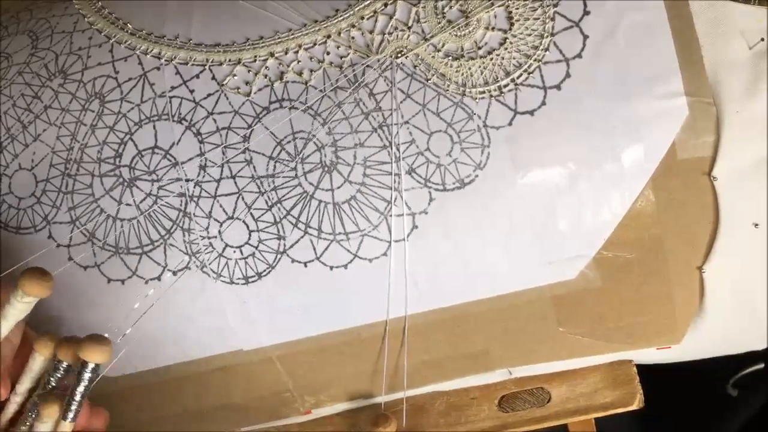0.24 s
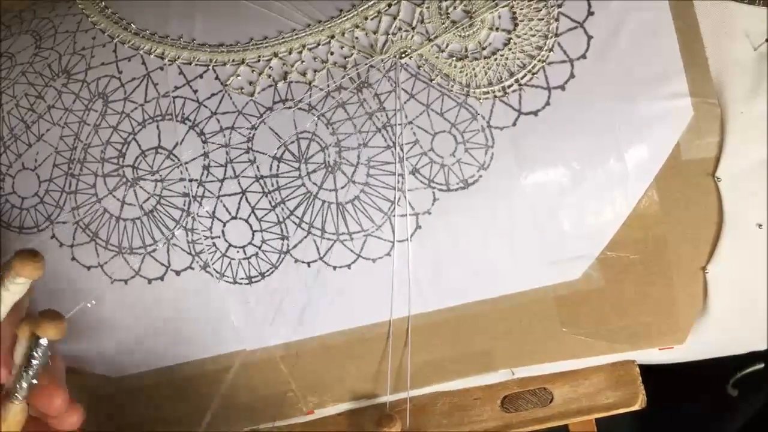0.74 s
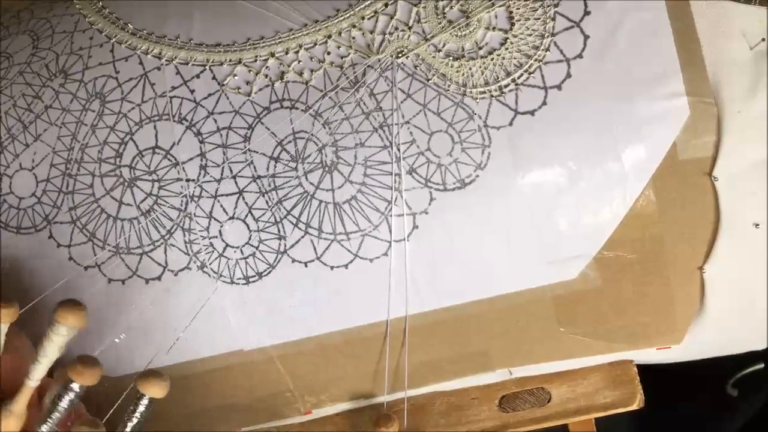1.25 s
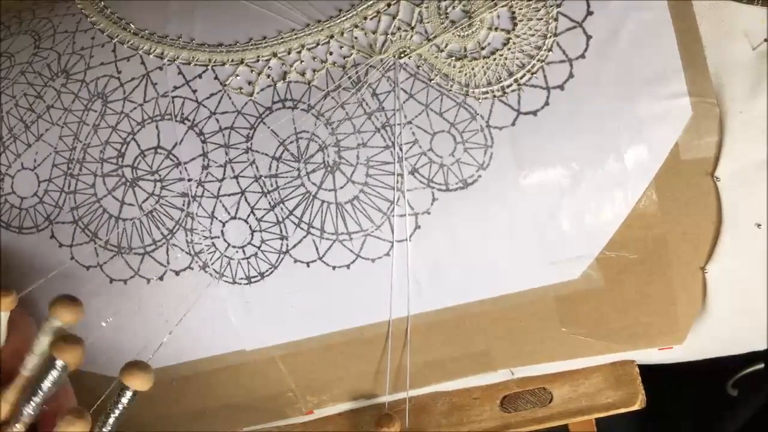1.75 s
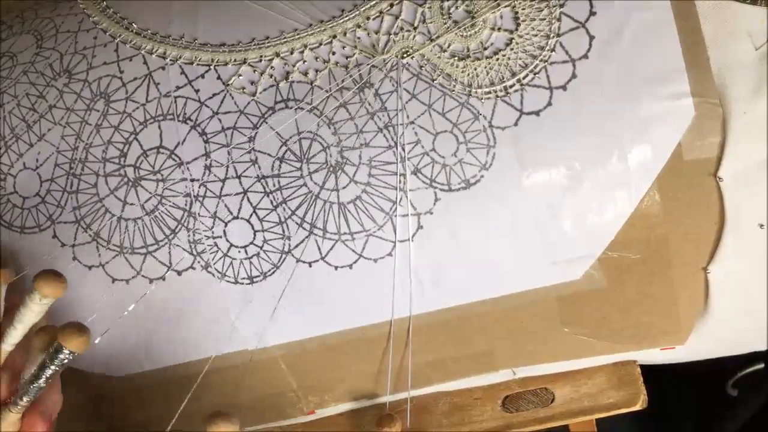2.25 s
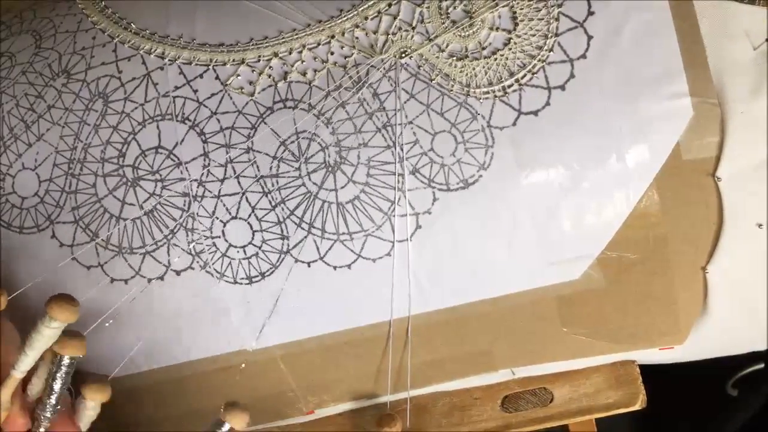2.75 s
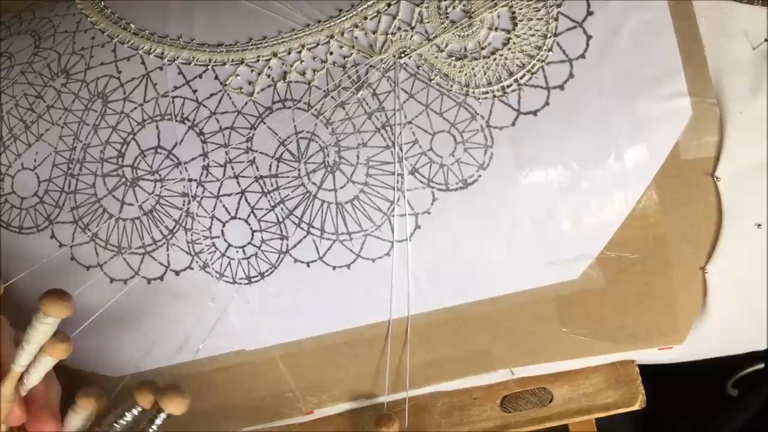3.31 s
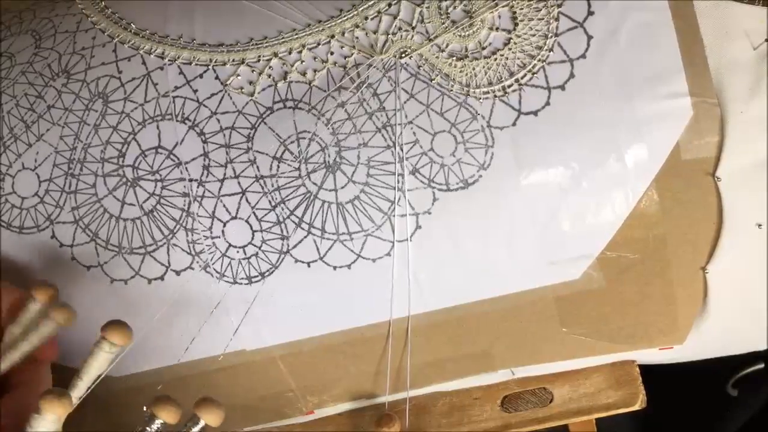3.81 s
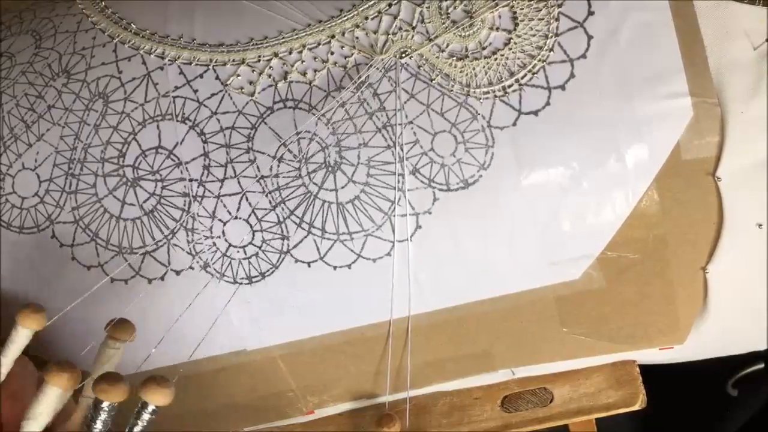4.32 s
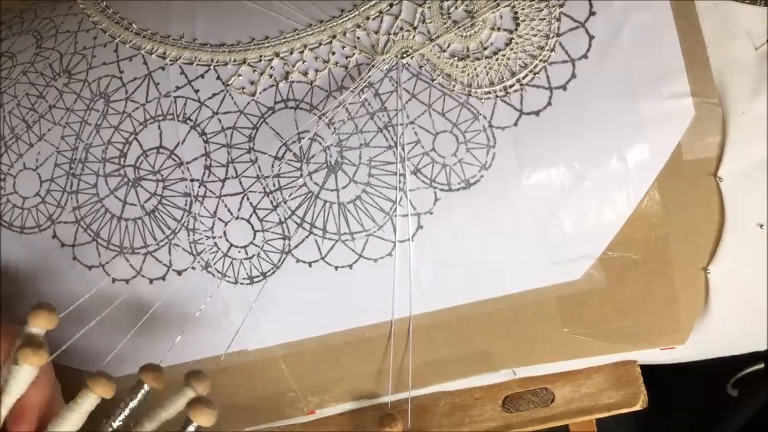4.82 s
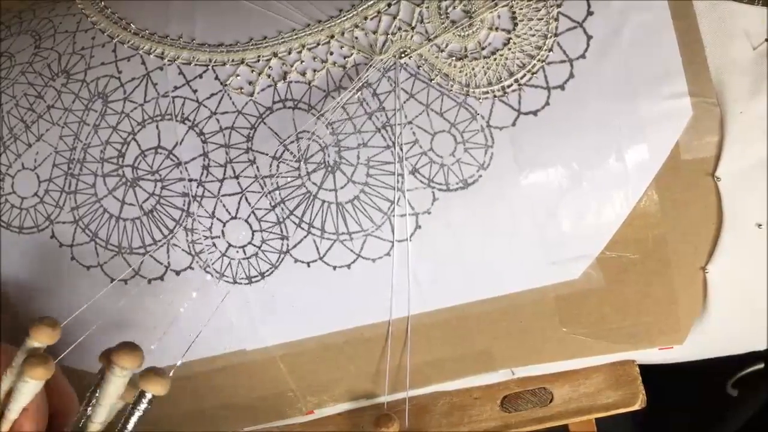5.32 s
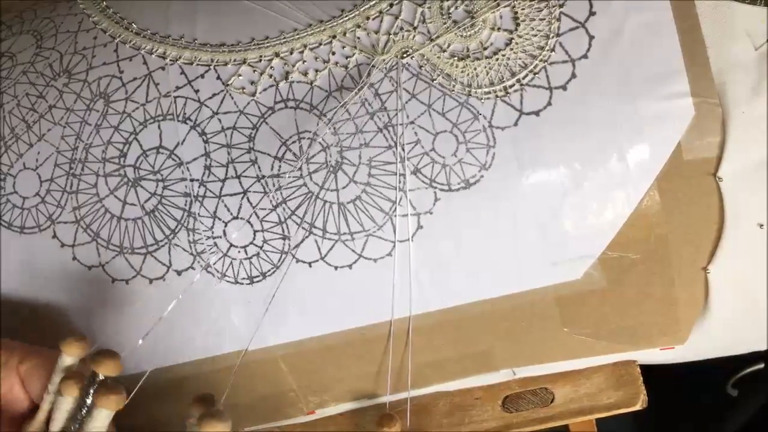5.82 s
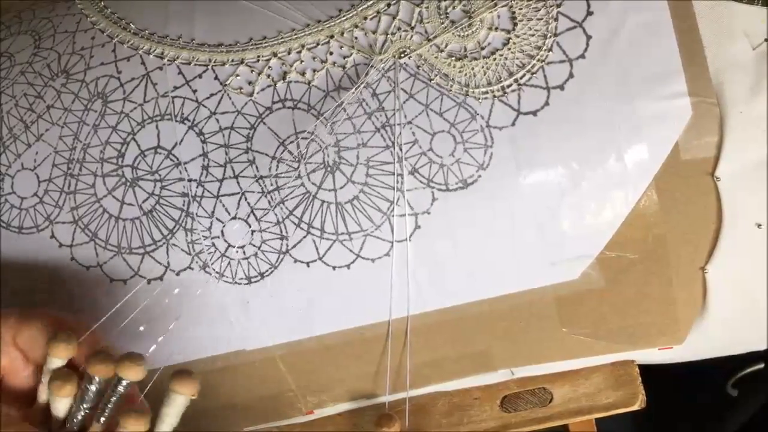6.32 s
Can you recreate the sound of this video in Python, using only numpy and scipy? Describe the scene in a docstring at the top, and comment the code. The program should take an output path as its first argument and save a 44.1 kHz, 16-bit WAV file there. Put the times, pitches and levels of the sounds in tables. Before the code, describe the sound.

Hard little sticks of wood click together irregularly as lace is worked by hand, heard from very near. Pairs and small flurries alternate with brief pauses, busier from about two and a half seconds on. Each click is crisp, high and quickly damped, some with a soft lower ring. Occasional duller knocks, a tiny chatter and faint rubbing join in. The small room adds a short tail over barely audible hum and air.

```python
"""A faint motor hum (slightly wavering sines) and soft air (shaped noise) fill a small quiet room throughout.
From the start wooden lace bobbins are crossed and twisted close by: each click rings the bending modes
of two slender sticks over a sharp noise tick and a dull clack, and some dull knocks ring the stand.
Under some clicks a lowest mode rings low and soft; later the shafts rub softly in the hand, as noise
sent through their modes, and near 5.3 s one chatters along the stand. A short diffuse tail is the room."""
import sys
import numpy as np
from scipy import signal
from scipy.fft import rfft, irfft
from scipy.io import wavfile

SR = 44100
rng = np.random.default_rng(int(sys.argv[2]) if len(sys.argv) > 2 else 0)


def master_out(mix):
    """Clip the mix to full scale and print it as 16-bit PCM to the path in sys.argv[1]."""
    frames = np.transpose(np.atleast_2d(mix))
    ceiling = np.clip(frames, -1, 1)
    pcm = np.round(ceiling * 32767).astype(np.int16)
    wavfile.write(sys.argv[1], SR, pcm)


N = 289296

# The four bending modes of each bobbin in play.
# Each entry: the bobbin's letter, then its mode frequencies in Hz from the lowest to the highest.
BOBBIN_MODES = {"A": (1057, 2861, 5348, 8290), "B": (1076, 2920, 5500, 8060), "C": (1122, 3190, 5654, 8460),
                "D": (1143, 3229, 5872, 8467), "E": (1167, 3304, 6020, 8640), "F": (1189, 3373, 6110, 8500),
                "G": (1216, 3477, 6380, 8930)}
ONSET = 260  # samples at the start of a sound (about 6 ms) on which its level is judged


def amp(db):
    """Decibels to gain."""
    return 10 ** (np.asarray(db) / 20)


def evened(x, count=None):
    """Scales to rms 1, judged on the first count samples."""
    return x / np.sqrt(np.mean(x[:count] ** 2) + 1e-20)


def read(points, hz):
    """Joins (Hz, value) points on a log-frequency axis."""
    f, value = np.transpose(points)
    return np.interp(np.log(hz + 1), np.log(f + 1), value)


def add(mix, s, sound):
    """Lays a sound into the mix at time s."""
    part = mix[max(round(s * SR), 0):][:len(sound)]
    part += sound[:len(part)]


def coloured(x, points):
    """Filters x by a curve of (Hz, dB) points."""
    hz = np.fft.rfftfreq(len(x), 1 / SR)
    return irfft(rfft(x) * amp(read(points, hz)), len(x))


def high_pass(x, hz):
    """Takes away the lows: thin sticks radiate little below their modes."""
    return signal.sosfilt(signal.butter(2, hz, "high", fs=SR, output="sos"), x)


def drift(rate_hz):
    """Slow random movement of rms 1."""
    hz = np.fft.rfftfreq(N, 1 / SR)
    return evened(irfft(rfft(rng.standard_normal(N)) * np.exp(-(hz / rate_hz) ** 2), N))


def ring(t, hz, t60, rise=0.0003):
    """One mode, swelling during the contact (rise in s) and falling 60 dB in t60 seconds."""
    return np.sin(2 * np.pi * hz * t) * amp(-60 * t / t60) * (1 - np.exp(-t / rise))


def either_sign():
    """Random polarity."""
    return rng.choice([-1, 1])


def background(air_level_db=-59.5, waver=0.15, wander_rad=1.0):
    """Soft room noise and a motor hum whose tones waver slightly in level and phase."""
    # Colour of the air. Each row: frequency in Hz, relative density in dB per Hz.
    air_colour = [(25, -22.5), (42, -13), (60, 9.5), (90, -9.5), (160, -13.5), (280, -13.5), (420, -20),
                  (1000, -26), (2200, -30.5), (5000, -40), (16000, -47.5)]
    # Tones of the motor hum. Each row: frequency in Hz, mean level in dB rms before the slight waver.
    hum_tones = [(59, -59), (235.7, -70.5), (294.5, -72), (471.3, -75), (555, -82)]
    t = np.arange(N) / SR
    air = coloured(rng.standard_normal(N), air_colour)
    air /= np.std(high_pass(air, 90))  # level judged above the rumble
    hum = np.zeros(N)
    for hz, db in hum_tones:
        level = amp(db) * np.sqrt(2) * (1 + waver * drift(17))
        hum += level * np.sin(2 * np.pi * hz * t + wander_rad * drift(2.3))
    return amp(air_level_db) * air + hum


def skid(start_s=5.27, length_s=0.015, db=-49, count=7):
    """A bobbin chatters along the stand: a quick uneven run of light knocks, as (s, dB) rows."""
    return [(start_s + length_s * (k + rng.random()) / count, db) for k in range(count)]


def knocks(scatter=0.056):
    """A bobbin against the stand: short dull modes, a little different at each spot struck."""
    # Knocks on the stand. Each row: start in seconds, level in dB.
    stand_hits = [(0.0187, -44.5), (1.3967, -48), (1.423, -48), (3.7274, -37.5), (4.524, -41),
                  (4.986, -46.5), (5.1032, -26.5), (5.148, -43.5), (5.291, -38), (5.551, -40.5),
                  (5.691, -40.5), (5.7591, -37.5), (5.7722, -41)]
    # What a knock rings with. Each row: nominal frequency in Hz, t60 in seconds, relative level in dB.
    stand_modes = [(1330, 0.036, -16.5), (1857, 0.04, -11), (2231, .028, -4), (2625, 0.022, -6.5),
                   (2974, 0.029, 1), (3293, 0.026, 0.5), (4190, .018, -4.5), (4930, 0.021, -31.5),
                   (6670, 0.011, 0.5)]
    out, t = np.zeros(N), np.arange(3000) / SR
    for s, db in stand_hits + skid():
        wood = np.zeros(len(t))
        for hz, t60, mode_db in stand_modes:
            spot_hz = hz * (1 + scatter * rng.uniform(-1.94, 1))
            wood += either_sign() * amp(mode_db) * ring(t, spot_hz, t60)
        add(out, s, amp(db) * evened(high_pass(wood, stand_modes[0][0]), ONSET))
    return out


def mode_levels(strength_db, spot_db, hardness_db):
    """The spot favours the second or third mode; hardness lifts the fourth; the lowest stays faint."""
    lowest = -57.5 + 0.36 * strength_db  # rises far less than the strength does
    second = strength_db - max(spot_db, 0)
    third = strength_db + min(spot_db, 0)
    fourth = strength_db - 15 + 0.81 * hardness_db
    return lowest, second, third, fourth


def two_bobbins(t, hz, other_hz, bundle_hz, t60, hold, other_db, other_ring=0.69,
                bundle_db=-11, bundle_spread=0.02, bounce=0.52):
    """One bending mode on both sticks, beating; neighbours and early reflections join in."""
    # no two are turned quite alike
    answer = ring(t, other_hz * rng.normal(1, 0.013), t60 * hold * other_ring)
    wood = ring(t, hz, t60 * hold) + either_sign() * amp(other_db) * answer
    # two neighbours in the bundle are shaken and swell more slowly
    for neighbour_hz in rng.choice(bundle_hz, size=2) * rng.normal(1, bundle_spread, size=2):
        wood += either_sign() * amp(bundle_db) * ring(t, neighbour_hz, t60 * other_ring, rise=0.003)
    heard = wood.copy()
    for delay_s in rng.uniform(0.0005, 0.0049, size=2):  # the pillow and the hand throw it back
        add(heard, delay_s, bounce * rng.uniform(-0.98, 1) * wood)
    return evened(high_pass(heard, 0.55 * hz), ONSET)


def contact_tick(t, t60=0.012, top_hz=12600, top_db=-6, top_t60=0.02):
    """The sharp tick of wood meeting wood: a noise burst and a fifth mode near top_hz."""
    # Colour of the tick. Each row: frequency in Hz, relative level in dB.
    tick_colour = [(700, -42.5), (2000, -18), (4200, -0.5), (7400, 11.5), (9300, -2.5), (10300, -15),
                   (11500, 1.5), (12600, 3), (14000, -19), (16000, -16)]
    tick = coloured(rng.standard_normal(len(t)), tick_colour) * amp(-60 * t / t60)
    tick /= np.std(high_pass(tick, 10000)[:ONSET])  # level judged in the top treble
    tick += amp(top_db) * evened(ring(t, top_hz * rng.normal(1, 0.037), top_t60), ONSET)
    return high_pass(tick, 1200)


def clack(t, level_db=-23.5, t60=0.042):
    """The rough, dull part of a contact, a noise burst there however soft the contact is."""
    # Colour of the clack. Each row: frequency in Hz, relative level in dB.
    clack_colour = [(800, -28), (2100, -6), (4400, 4), (9000, -21), (16000, -38.5)]
    burst = coloured(rng.standard_normal(len(t)), clack_colour) * amp(-60 * t / t60)
    return amp(level_db) * evened(burst, ONSET)


def clicks(modes_db=-2):
    """Two bobbins of slightly different pitch ring together and beat; the grip sets how long."""
    # Bobbin against bobbin. Each row: start in seconds, strength in dB, striking spot as third mode
    # over second in dB, hardness in dB, struck bobbin, striking bobbin, grip.
    contacts = [ (0.0195, -35.5, -0.5, -9, "C", "D", "held"), (.1233, -35, 0, -5.5, "E", "D", "held"),
                (.2793, -53.5, -12, -8, "E", "E", "loose"), (0.5965, -52.5, -20, -5, "F", "G", "held"),
                (0.7238, -42, -6, -1, "A", "D", "pinched"), (0.7312, -43.5, 8, -9, "A", "G", "pinched"),
                (1.1044, -36.5, 0, 11.5, "G", "F", "loose"), (1.3667, -30.5, 1.5, 8, "G", "D", "free"),
                (1.3938, -29.5, 3, 14, "E", "A", "loose"), (1.421, -36.5, -8.5, -12, "G", "F", "loose"),
                (1.4702, -43, 13, -13, "C", "A", "free"), (1.503, -43, 11, -19, "D", "A", "loose"),
                (1.8237, -29, 10.5, -4, "B", "A", "loose"), (1.849, -34.5, -10.5, -15, "G", "F", "held"),
                (2.131, -55.5, -18, -15, "B", "A", "held"), (2.236, -62, -9, -1, "A", "E", "held"),
                (2.532, -22.5, -3.5, 10, "E", "D", "held"), (2.839, -26.5, 1.5, -4, "D", "D", "held"),
                (2.8785, -40.5, -6, -11, "D", "C", "loose"), (3.0063, -35.5, 6.5, 9, "D", "E", "pinched"),
                (3.132, -31.5, 10, 10, "A", "A", "free"), (3.1386, -23, -0.5, 12.5, "D", "D", "loose"),
                (3.265, -44.5, -9, -5, "D", "E", "loose"), (3.287, -42.5, -6, 2, "F", "D", "loose"),
                (3.4532, -26, 3.5, -2.5, "D", "A", "held"), (3.4973, -28, 7, -7, "C", "A", "held"),
                (3.5667, -21.5, 9.5, -4.5, "F", "G", "loose"), (3.605, -34, 0.5, 3.5, "E", "C", "held"),
                (3.6629, -38, -8.5, -3, "D", "G", "free"), (3.727, -38.5, 0.5, 7.5, "G", "C", "loose"),
                (3.8039, -38.5, -18, -11, "G", "D", "pinched"), (3.8651, -31.5, -4, -4, "E", "A", "free"),
                (3.961, -23, 2.5, -6, "E", "D", "loose"), (3.975, -21, -2, 4.5, "E", "D", "loose"),
                (3.9923, -20.5, -1.5, -14, "D", "E", "loose"), (4.126, -29, -7.5, -11, "E", "F", "held"),
                (4.223, -39.5, 1.5, 7.5, "G", "F", "loose"), (4.5224, -21, 14, 8.5, "A", "C", "loose"),
                (4.54, -23.5, 7.5, 9, "D", "E", "loose"), (4.6434, -30.5, 3, 4, "C", "F", "held"),
                (4.7668, -50.5, 12.5, 14.5, "A", "G", "loose"), (4.952, -49.5, -14.5, -3, "D", "D", "free"),
                (5.1032, -16.5, 10, 13.5, "A", "F", "loose"), (5.208, -34.5, 7, -8, "G", "F", "pinched"),
                (5.238, -45, -7, -4, "E", "G", "free"), (5.291, -37, 4, -7, "C", "D", "loose"),
                (5.334, -30, 1.5, 1.5, "E", "G", "free"), (5.5504, -27.5, -6, 3.5, "F", "C", "held"),
                (5.637, -43, -22, -24, "B", "D", "pinched"), (5.6682, -47, -16, -8, "D", "G", "loose"),
                (5.7609, -32.5, -2, -2, "B", "D", "loose"), (5.768, -29, 0.5, -4, "A", "E", "loose"),
                (5.7954, -38, 1.5, -13, "E", "D", "loose"), (5.878, -49.5, 1.5, 8.5, "E", "E", "held"),
                (6.098, -37, 11.5, 5.5, "B", "A", "free"), (6.1595, -27, -2, 9, "D", "E", "loose"),
                (6.1928, -43.5, -20, -1, "G", "F", "loose"), (6.279, -18.5, 9, 7.5, "C", "G", "free"),
                (6.2814, -22, 6, 11, "B", "A", "loose"), (6.4095, -32.5, -0.5, -8, "E", "E", "loose"),
                (6.4638, -48.5, -6, -11, "F", "F", "held"), (6.5143, -42.5, -7, -14, "B", "B", "free")]
    # How each bending mode rings, lowest first. Each row: t60 in seconds before the grip acts,
    # level of the other bobbin in dB relative to the leading one.
    bending = [(0.16, -0.5), (0.051, -9), (0.025, -5.5), (0.019, 6)]
    # How long the fingers let a bobbin ring. Each entry: the grip, then its factor on the t60 of both.
    grips = {"pinched": 0.37, "held": 0.64, "loose": 0.87, "free": 1.62}
    out, t = np.zeros(N), np.arange(6000) / SR
    bundle = list(zip(*BOBBIN_MODES.values()))  # each mode across all bobbins
    for s, strength_db, spot_db, hardness_db, struck, striking, grip in contacts:
        # the struck bobbin leads in the two lower modes, the striking one in the two upper
        leading = BOBBIN_MODES[struck][:2] + BOBBIN_MODES[striking][2:]
        answering = BOBBIN_MODES[striking][:2] + BOBBIN_MODES[struck][2:]
        levels_db = mode_levels(strength_db, spot_db, hardness_db)
        click = amp(strength_db) * clack(t)
        for hz, other_hz, bundle_hz, level_db, (t60, other_db) in zip(
                leading, answering, bundle, levels_db, bending):
            wood = two_bobbins(t, hz, other_hz, bundle_hz, t60, grips[grip], other_db)
            click += amp(level_db + modes_db) * wood
        # the tick grows faster than the strength and the hardness do
        tick_db = -24 + 1.253 * strength_db + 1.286 * hardness_db
        add(out, s, click + amp(tick_db) * contact_tick(t))
    return out


def low_rings(level_db=-2, t60=0.1, rise=0.0018, neighbour_db=-7):
    """The lowest mode of a bobbin and of a long neighbour, heard low and soft under some clicks."""
    # Low rings. Each row: start in seconds, level in dB before the common trim level_db, bobbin.
    low_ring_rows = [(0.725, -56.5, "D"), (1.104, -59.5, "D"), (1.396, -42.5, "D"), (1.469, -55.5, "D"),
                     (1.826, -56, "D"), (1.847, -54.5, "D"), (2.533, -52.5, "D"), (2.839, -57.5, "C"),
                     (3.136, -50, "F"), (3.607, -56, "C"), (3.664, -53.5, "G"), (3.865, -58, "F"),
                     (3.964, -46.5, "C"), (4.525, -53.5, "C"), (5.29, -59, "F"), (5.334, -56.5, "G"),
                     (6.186, -57, "E")]
    out, t = np.zeros(N), np.arange(6000) / SR
    for s, db, bobbin in low_ring_rows:
        neighbour_hz = BOBBIN_MODES["A"][0] * rng.normal(1, 0.013)
        wood = ring(t, BOBBIN_MODES[bobbin][0], t60, rise)
        wood += amp(neighbour_db) * ring(t, neighbour_hz, t60, rise)
        add(out, s, amp(db + level_db) * evened(wood, ONSET))
    return out


def rubs(level_db=-3, uneven_db=4.0, idle_db=-78, modes_db=(-20, 0, -2, -5), t60=0.0074, thread_db=-10):
    """Tiny slips, as uneven noise, sound the modes of all held bobbins; a trace never stops."""
    # Shafts and threads rubbing in the hand. Each row: middle in seconds, length in seconds,
    # peak level in dB before the common trim level_db.
    gestures = [(2.97, 0.15, -63), (3.28, 0.18, -58.5), (3.7, 0.28, -74), (3.964, 0.092, -51.5),
                (4.098, .25, -67.5), (4.514, 0.055, -59), (4.707, 0.15, -64), (5.099, 0.071, -61),
                (5.678, 0.56, -67), (6.053, 0.12, -57), (6.52, 0.27, -58.5)]
    t = np.arange(2000) / SR
    bundle = np.zeros(len(t))
    for modes in BOBBIN_MODES.values():
        for hz, db in zip(modes, modes_db):
            bundle += either_sign() * amp(db) * ring(t, hz, t60)
    slips = rng.standard_normal(N) * amp(uneven_db * drift(70))
    pressure = np.full(N, amp(idle_db))
    for s, length, db in gestures:
        add(pressure, s - length / 2, amp(db + level_db) * np.hanning(round(length * SR)))
    shafts = evened(high_pass(signal.fftconvolve(slips, bundle)[:N], 2000))
    threads = amp(thread_db) * evened(high_pass(slips, 3400))  # thread sliding over thread only hisses
    return pressure * (shafts + threads)


def room(x, wet_db=-14, first_wall=0.001, build=0.00067):
    """A diffuse noise tail from the nearest wall on (s), building up fast; its decay varies with pitch."""
    # Decay of the room. Each row: frequency in Hz, t60 in seconds.
    room_decay = [(3000, 0.27), (7000, 0.23), (13000, 0.31)]
    hz, t, z = signal.stft(rng.standard_normal(SR // 2), SR, nperseg=256)
    decay = amp(-60 * t / read(room_decay, hz)[:, None])
    tail = signal.istft(z * decay, SR, nperseg=256)[1]
    since_wall = np.maximum(np.arange(len(tail)) / SR - first_wall, 0)
    tail *= 1 - np.exp(-since_wall / build)
    return amp(wet_db) * signal.fftconvolve(x, tail / np.linalg.norm(tail))[:N]


def scene():
    """Bobbins, their room, its air and its hum, in one channel."""
    wood = knocks() + clicks() + low_rings() + rubs()
    return (wood + room(wood) + background())[None]


def record(dry, edge_hz=16000):
    """Band limit: a steep low-pass at edge_hz."""
    low_pass = signal.firwin(255, edge_hz, window=("kaiser", 9), fs=SR)
    return signal.oaconvolve(dry, low_pass[None], "same")


dry = scene()
out = record(dry)
master_out(out)
```